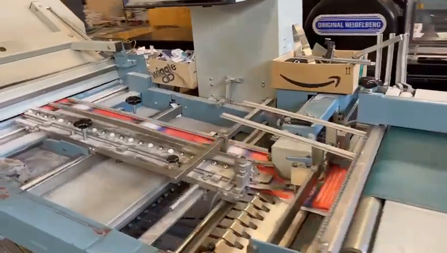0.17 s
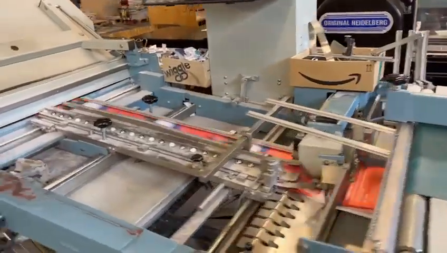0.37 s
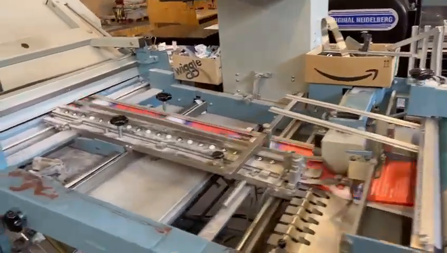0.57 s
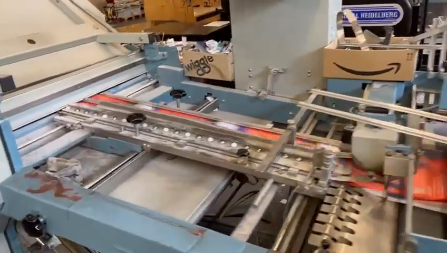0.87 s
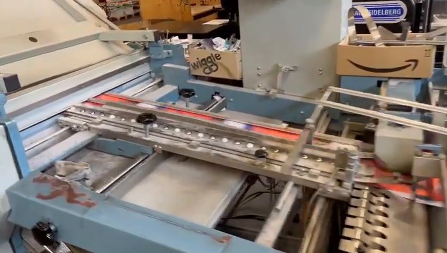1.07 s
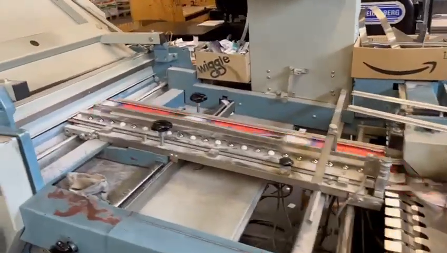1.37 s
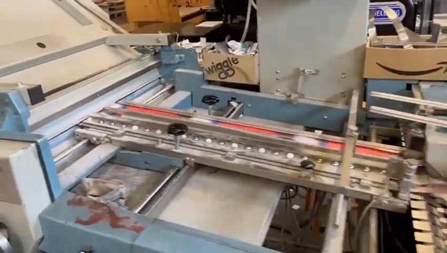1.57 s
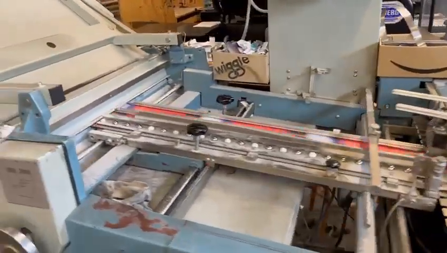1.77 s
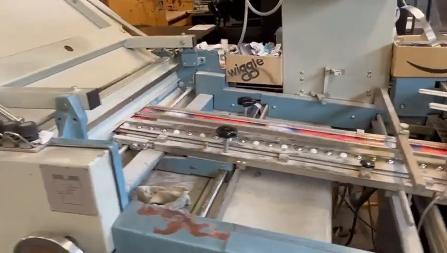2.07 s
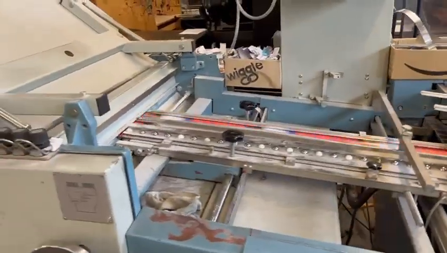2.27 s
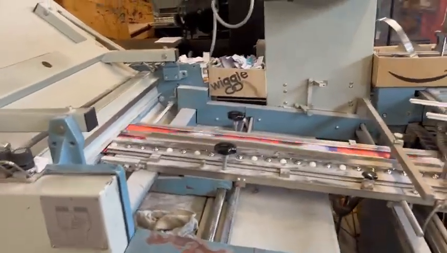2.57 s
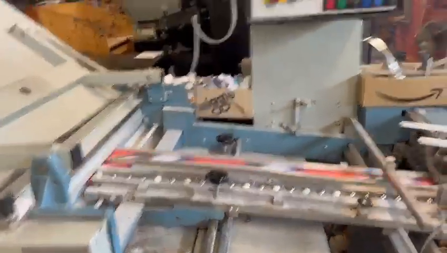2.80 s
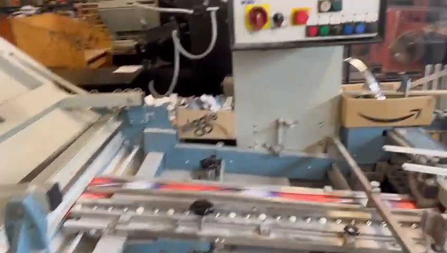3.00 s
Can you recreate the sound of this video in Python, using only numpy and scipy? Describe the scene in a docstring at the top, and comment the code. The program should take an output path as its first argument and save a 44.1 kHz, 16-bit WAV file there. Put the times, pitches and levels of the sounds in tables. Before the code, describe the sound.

A paper folding machine runs without pause in a print workshop, heard close: dense roller whir, five metal knocks a second, each followed by a papery rush, slap and light tap; clatter slowly recedes.

```python
"""Paper folder, close by the fold plates

A folding machine in a print workshop takes about five sheets a second; rollers and gears whir as dense tiny contacts.
Each cycle brings a metal knock of ringing modes, a noise rush of paper with a swelling hum, then a slap and a lighter tap.
Ticks, clunks, rattles and one low thump fall between, with short reflections from the panels and the room.
The microphone draws slowly away from the clatter, then comes back a little at the end."""
import sys
import numpy as np
from scipy import signal
from scipy.fft import rfft, irfft
from scipy.io import wavfile

SR = 44100
rng = np.random.default_rng(int(sys.argv[2]) if len(sys.argv) > 2 else 0)


def inscribe(sig):
    """Save sig as 16-bit PCM at rate SR to the path in sys.argv[1].

    A 1-D sig is mono; a 2-D sig holds one channel per row.
    Samples are clipped to [-1, 1] before scaling.
    """
    pcm = np.round(np.clip(np.atleast_2d(sig).T, -1, 1) * 32767)
    wavfile.write(sys.argv[1], SR, pcm.astype(np.int16))


N = 138474
T = np.arange(N) / SR
FFT_SIZE = 9 * 2 ** 14
HZ = np.maximum(np.arange(FFT_SIZE // 2 + 1) * SR / FFT_SIZE, 1)

CYCLE_S, FIRST_CYCLE_S = .1897, .0855
SHEET_FOLLOWS = 0.88   # share of the change with closeness that paper noise takes

# slap of each sheet leaving the fold: t/s, relative level/dB
SLAP_TIMES = [(0.0222, -7), (0.2098, -10), (0.3988, -8.5), (0.5927, -8.5), (0.7902, -9.5), (0.9699, -11),
              (1.1599, -16), (1.3482, -9), (1.5384, -7), (1.7297, -12), (1.9176, -9.5), (2.1128, -9),
              (2.2991, -8), (2.4924, -6.5), (2.6787, -12), (2.8641, -11), (3.0616, -13)]
# lighter tap late in each cycle: t/s, relative level/dB
TAP_TIMES = [(0.0505, -10.5), (0.2368, -8.5), (0.4281, -15), (0.6186, -7.5), (0.8087, -8.5), (0.9991, -7),
             (1.1889, -8.5), (1.3778, -9.5), (1.5655, -9), (1.756, -12.5), (1.9462, -11), (2.1353, -9.5),
             (2.327, -8), (2.5174, -8), (2.7057, -12), (2.8936, -13.5), (3.0896, -13)]
# knock opening each cycle: t/s, body/dB, bright ring/dB, clang f/Hz, clang/dB, ping f/Hz, ping/dB (levels relative)
KNOCK_TIMES = [(0.0907, -14, -19, 685, -12, 3720, -12.5), (0.2790, -12, -21.5, 650, -20, 4600, -20),
               (0.4660, -13, -17, 1020, -17, 2330, -16), (0.6560, -10.5, -13.5, 1890, -9, 3800, -14),
               (0.8464, -13, -16, 1870, -13.5, 3800, -17), (1.0350, -13.5, -16.5, 1730, -18, 2760, -18),
               (1.2250, -14, -13, 2830, -17, 3444, -13), (1.4145, -14, -15, 1530, -17, 3420, -11),
               (1.6040, -15.5, -16, 1520, -17, 3730, -13), (1.7940, -22, -30, 1480, -17, 2450, -22),
               (1.9840, -16.5, -18.5, 1543, -16, 3600, -19), (2.1750, -15.5, -14.5, 1510, -13, 3320, -17),
               (2.3640, -16.5, -18, 1600, -19, 3800, -18), (2.5555, -16.5, -18, 810, -19, 3800, -14),
               (2.7440, -13, -15, 1550, -11, 3820, -19), (2.9315, -18, -17, 1520, -15, 3080, -13),
               (3.1290, -15.5, -19, 1550, -18, 3600, -21)]
# snapping paper, in crackle and ticks: f/Hz, relative level/dB per Hz
PAPER_SNAP = [(300, -27), (1000, -13), (1700, 3.5), (2400, 3.5), (3400, 2), (5000, -9.5), (7000, -22.5),
              (12000, -25.5)]


def from_db(db):
    """Decibels to gain."""
    return 10 ** (np.asarray(db) / 20)


def rms_one(x):
    """Scale to unit power."""
    return x / np.sqrt(np.mean(x ** 2) + 1e-20)


def decay(age, t60):
    """Exponential decay that falls 60 dB in t60 seconds."""
    return np.exp(-np.log(1000) * age / t60)


def over_hz(points):
    """Read a table along log frequency."""
    hz, value = np.transpose(points)
    return np.interp(np.log(HZ), np.log(hz), value)


def colour(x, spectrum):
    """Minimum-phase filter with the given spectrum, its phase found by folding the cepstrum; unit power out."""
    cepstrum = irfft(np.log(from_db(over_hz(spectrum))))
    cepstrum[1:FFT_SIZE // 2] *= 2
    cepstrum[FFT_SIZE // 2 + 1:] = 0
    response = np.exp(rfft(cepstrum))
    return rms_one(irfft(rfft(x, FFT_SIZE) * response)[..., :N])


def drift(rate_hz):
    """Slow chance with unit spread, drawn at every 32nd sample."""
    lowpass = signal.butter(2, rate_hz, fs=SR / 32, output="sos")
    slow = signal.sosfilt(lowpass, rng.standard_normal(N // 32 + 1002))[1000:]   # drop the filter's start
    return np.interp(np.arange(N) / 32, np.arange(len(slow)), rms_one(slow))


def grains(per_s, spread_db, smooth, smear_s=0.0073, count=3):
    """Tiny uneven contacts scattered in time, over smooth noise; two channels share times but not signs or scatter."""
    out, age = 0, T[:SR // 50]
    for _ in range(count):
        struck = rng.random(N) < per_s / count / SR
        sizes = struck * from_db(spread_db * np.minimum(rng.exponential(1, N), 3))
        scatter = rfft(rng.standard_normal((2, len(age))) * decay(age, smear_s))
        kernel = irfft(scatter / np.abs(scatter) ** .5)   # evens out the scatter's spectrum
        signed = sizes * rng.choice([-1, 1], (2, N))
        out = out + signal.oaconvolve(signed, kernel, axes=1)[:, :N]
    return rms_one(rms_one(out) + smooth * rng.standard_normal((2, N)))


def stereo_pair(pair):
    """Two unrelated signals become a partly alike stereo pair."""
    # likeness of left and right: f/Hz, likeness (limited below to 0-0.99)
    likeness = [(60, 1.6), (130, 1.2), (270, 1), (590, .5), (1100, 0.25), (1550, 0.4), (1850, 0.55),
                (2400, 0.62), (3400, 0.38), (5000, 0.76), (6600, 0.1), (7600, 0.96), (11000, 1.75)]
    # stereo phase: f/Hz, left minus right/rad; near-opposite sides in the high treble
    phase_lead = [(60, 0), (500, -.2), (1050, -.8), (1550, -2.3), (1800, 0), (2400, .2), (3000, .7),
                  (5000, .1), (6500, -.8), (7400, -3.1), (9550, -3.2), (9900, -4.6), (10500, -5.1),
                  (11000, -6.3)]
    # stereo level: f/Hz, left minus right/dB
    tilt = [(60, -0.5), (350, 1.7), (700, -1), (1200, -2.5), (1550, -4.5), (1780, 3.5), (2300, 2),
            (3300, 4), (5000, 1), (8000, 2), (11000, 0)]
    mid, side = rfft(pair, FFT_SIZE)
    alike = np.clip(over_hz(likeness), 0, .99)
    sign = np.array([[1], [-1]])
    both = (np.sqrt(1 + alike) * mid + sign * np.sqrt(1 - alike) * side) / np.sqrt(2)
    level = from_db(sign * over_hz(tilt) / 2)
    turn = np.exp(.5j * sign * over_hz(phase_lead))
    return irfft(both * level * turn)[:, :N]


def pan(x, left_db):
    """Place a sound between the ears by level, left_db being left minus right."""
    return x * from_db([[left_db / 2], [-left_db / 2]])


def since(offset_s):
    """Time since a given point of the machine's cycle last came round."""
    return (T - FIRST_CYCLE_S - offset_s) % CYCLE_S


def passing():
    """How far a sheet is in the rollers, 0-1."""
    in_s, rise_s, out_s, fall_s = 0.011, 0.016, 0.11, 0.033
    age = since(0)
    return np.clip((age - in_s) / rise_s, 0, 1) * np.clip(1 - (age - out_s) / fall_s, 0, 1)


def bursts(rows, attack_s, jitter_s, vary_db):
    """Envelope of bursts that return every cycle, each with its own small delay and strength."""
    power = 0
    for offset_s, db, t60 in rows:
        late, strong = rng.standard_normal((int(T[-1] / CYCLE_S) + 4, 2)).T
        cycle = ((T - FIRST_CYCLE_S - offset_s) / CYCLE_S + 2).astype(int)
        age = np.maximum(since(offset_s) - jitter_s * np.abs(late)[cycle], 0)
        gain = from_db(db + vary_db * strong)[cycle]
        power = power + (np.minimum(age / attack_s, 1) * gain * decay(age, t60)) ** 2
    return np.sqrt(power)


def swells(rows, attack_s):
    """Envelope of single bursts (t/s, level/dB, t60/s), each ending after its t60."""
    out = np.zeros(N)
    for s, db, t60 in rows:
        live = slice(*np.searchsorted(T, [s, s + t60]))
        age = T[live] - s
        out[live] += from_db(db) * np.minimum(age / attack_s, 1) * decay(age, t60)
    return out


def strike(hits, modes, vary_db):
    """Clicks set decaying resonators ringing, each mode with a strength of its own for every click."""
    s, db = np.transpose(hits)
    at = np.clip((s * SR).astype(int), 0, N - 1)
    out = np.zeros(N)
    for k, (hz, mode_db, t60) in enumerate(modes):
        clicks = np.full(N, 1e-18)
        clicks[at] = from_db(db + mode_db + vary_db * rng.standard_normal(len(s)))
        r = decay(1 / SR, t60)
        w = 2 * np.pi * hz / SR
        ring = signal.lfilter([0, np.sin(w)], [1, -2 * r * np.cos(w), r * r], clicks)
        out += (-1) ** k * ring
    return out


def rings(rows, t60):
    """Single rings (t/s, level/dB, f/Hz), all dying at the same rate."""
    return sum(strike([(s, db)], [(hz, 0, t60)], vary_db=0.5) for s, db, hz in rows)


def rollers(near_db, level_db=-23.5, follows=0.35):
    """Rollers, belts and gears whir without a break: countless small contacts."""
    # whir spectrum: f/Hz, relative level/dB per Hz
    whir = [(25, -25), (50, -11.5), (70, -2), (90, -1), (125, -3), (155, -2), (190, -4), (260, 0),
            (400, -1.5), (520, -0.5), (720, -1.5), (1050, -2.5), (1550, -1.5), (2100, -5), (2700, -7),
            (4000, -9.5), (6300, -15), (8500, -25.5), (10500, -19.5), (12000, -25)]
    contacts = grains(per_s=1200, spread_db=2.0, smooth=0.73, smear_s=0.014)
    return from_db(level_db + follows * near_db) * colour(contacts, whir)


def sheets(near_db, rush_db=-25, flutter_db=1.4):
    """Each sheet rushes through the rollers as grainy noise, its edges flicking as it is folded."""
    # rush spectrum: f/Hz, relative level/dB per Hz
    rush_spectrum = [(100, -12.5), (220, 0.5), (300, 0), (450, 1.5), (750, 0.5), (1000, -3), (1600, -0.5),
                     (2200, -2), (3000, 1), (4200, -4.5), (5200, -5), (6500, -6), (8500, -11.5),
                     (10500, -9.5), (12000, -13)]
    # flick spectrum: f/Hz, relative level/dB per Hz
    flick_spectrum = [(500, -24), (2000, -9), (3500, 5.5), (6000, 10.5), (9000, -16), (12000, -21)]
    # flicking paper edges: t into the cycle/s, level before closeness/dB, t60/s
    flick_times = [(.017, -33.5, .05), (.072, -29, 0.074), (.1215, -25, 0.064), (.147, -29.5, 0.045)]
    flutter = from_db(rush_db + flutter_db * drift(51))
    paper = grains(per_s=1000, spread_db=2.5, smooth=0.61, smear_s=0.0091)
    rush = flutter * passing() * colour(paper, rush_spectrum)
    edges = grains(per_s=3400, spread_db=-0.5, smooth=0.83)
    flick_shape = bursts(flick_times, attack_s=0.001, jitter_s=.0015, vary_db=3.0)
    flicks = flick_shape * colour(edges, flick_spectrum)
    return from_db(SHEET_FOLLOWS * near_db) * (rush + flicks)


def crackle(near_db, level_db=-30):
    """The passing sheet crackles in small, separate snaps."""
    snaps = grains(per_s=260, spread_db=2.5, smooth=0, smear_s=.004)
    return from_db(level_db + SHEET_FOLLOWS * near_db) * passing() * colour(snaps, PAPER_SNAP)


def rattles(near_db, follows=0.32):
    """Loose guides rattle as noise bursts at set points of the cycle, and clatter louder a few times near the start."""
    # rattle in each cycle: t into the cycle/s, level before closeness/dB, t60/s
    rattle_times = [(.002, -26, 0.051), (.031, -23, .04), (.069, -31, 0.054), (.128, -29.5, 0.058),
                    (.172, -27, 0.023)]
    # louder clatters: t/s, level/dB, t60/s
    clatter_times = [(.116, -18, 0.056), (.166, -16, .03), (.306, -21, .06), (.323, -24, 0.052),
                     (.536, -18, .04)]
    # rattle spectrum: f/Hz, relative level/dB per Hz
    spectrum = [(60, -18), (300, 3.5), (520, -5.5), (720, 5), (900, -1), (1600, -0.5), (2600, -5),
                (3500, -6.5), (4500, -21), (7000, -12), (12000, -21)]
    shape = bursts(rattle_times, attack_s=0.0011, jitter_s=0.0011, vary_db=2.0)
    shake = from_db(follows * near_db) * shape
    clatter = swells(clatter_times, attack_s=.002)
    return np.hypot(shake, clatter) * colour(grains(per_s=2500, spread_db=2.0, smooth=0.64), spectrum)


def frame(near_db, level_db=-30, hits_per_s=130, idle=0.81, spread_db=2):
    """Guide balls and gears strike the frame at random, louder while a sheet passes."""
    # resonances of frame and fold plates: f/Hz, relative level/dB, t60/s
    frame_modes = [(345, -9, 0.076), (516, -7.5, 0.079), (644, -5, 0.028), (736, -5.5, 0.059),
                   (1017, -7, 0.031), (1280, -.5, 0.031), (1537, -3, 0.04), (1787, -4, 0.031),
                   (1974, -1.5, 0.031), (2254, -6.5, 0.018), (2547, -6, 0.049), (2990, -2.5, 0.019),
                   (3480, -4, 0.02), (4990, -6, 0.016)]
    hits = [(s, spread_db * rng.standard_normal()) for s in T[rng.random(N) < hits_per_s / SR]]
    # same hits in both channels, with mode strengths drawn apart
    ringing = rms_one(np.array([strike(hits, frame_modes, vary_db=4.0) for _ in range(2)]))
    load = idle + (1 - idle) * passing()
    return from_db(level_db + near_db) * load * ringing


def hums(near_db):
    """Drive tones and panel resonances, most swelling and sinking with every sheet, roughened by slow chance."""
    # tones: f/Hz, level before closeness/dB, crest t into the cycle/s, swell depth 0-1, roughness 0-1,
    # waver rate/Hz, share of the change with closeness
    tones = [(95.1, -44, 0.17, 0.8, 0.28, 9.2, 0), (126.3, -45.5, 0.053, 0, 0.3, 8, 0),
             (408.7, -44, 0.061, 0.6, 0.54, 9.1, -1), (506.5, -43.5, 0.026, 0.3, 0.46, 10.4, 1),
             (679, -42, 0.059, 0, 0.95, 65, 2.5), (814, -43.5, 0.015, 0.66, 0.9, 48, -2),
             (1535, -45.5, 0.067, 0.46, 0.8, 39, 4.5)]
    out = 0
    for hz, db, crest_s, depth, rough, waver_hz, follows in tones:
        swell = 1 + np.clip(depth, 0, 1) * np.cos(2 * np.pi * since(crest_s) / CYCLE_S)
        turn, rough = 2 * np.pi * hz * T, np.clip(rough, 0, 1)
        steady = np.cos(turn)
        wavering = (drift(waver_hz) * np.cos(turn) + drift(waver_hz) * np.sin(turn)) / np.sqrt(2)
        tone = (1 - rough) * steady + rough * wavering
        out = out + from_db(db + follows * near_db) * rms_one(swell * tone)
    return pan(out, left_db=1.0)


def throb(level_db=-35, crest_s=0.074, sharpness=.85, waver=.13, waver_hz=14, bend_radians=.45):
    """A gear hum, locked to the cycle, throbs and bends in pitch as each sheet loads the drive."""
    gear_teeth = 36   # hum periods per cycle
    place = 2 * np.pi * since(crest_s) / CYCLE_S
    load = (.5 + .5 * np.cos(place)) ** sharpness
    bend = bend_radians * np.cos(2 * place)
    turn = 2 * np.pi * gear_teeth * T / CYCLE_S + bend + waver * drift(waver_hz)
    hum = load * (1 + waver * drift(waver_hz)) * np.cos(turn)
    return pan(from_db(level_db) * rms_one(hum), left_db=3.0)


def ticks(ring_db=-1.5, t60=.009, grit_db=-12.5):
    """Guide balls and paper edges tick between the knocks: a short ring and a little grit."""
    # sharp ticks: t/s, relative level/dB, f/Hz
    tick_times = [(.011, -14, 1800), (.167, -15, 2800), (.349, -11, 2000), (.728, -13, 2860),
                  (.916, -16, 3000), (.927, -17, 2000), (.950, -12, 2300), (1.103, -14, 2200),
                  (1.320, -13, 1720), (1.676, -18, 2200), (1.687, -17, 1500), (1.719, -22, 2500),
                  (1.824, -24, 2000), (2.081, -29, 2600), (2.248, -17, 3420), (2.311, -13, 2000),
                  (2.448, -23, 2400), (2.628, -18, 1990), (2.754, -19, 1600), (2.995, -20, 2300)]
    ring = rings([(s, db + ring_db, hz) for s, db, hz in tick_times], t60)
    grit = swells([(s - .001, db + grit_db, .02) for s, db, _ in tick_times], attack_s=.0005)
    return ring + grit * colour(rng.standard_normal(N), PAPER_SNAP)


def workshop(x, level_db=-3.5, t60=0.16):
    """Dense reflections from the machine's panels and the room: convolution with decaying noise."""
    tail = rng.standard_normal((2, N)) * decay(T, t60)
    tail /= np.sqrt(np.sum(tail ** 2) / 2)
    reflections = signal.fftconvolve(x[None], tail, axes=1)[:, :N]
    return from_db(level_db) * stereo_pair(reflections)


def scuffs():
    """Contacts grate as noise: a bright snap and a shudder on the knocks, a papery rustle on slaps and taps."""
    # grating snap of the knock: f/Hz, relative level/dB per Hz
    snap_spectrum = [(200, -13), (700, -4), (1000, -2), (1800, -3), (2400, -5), (3100, 2.5), (3900, 1.5),
                     (4500, -8), (5500, -24), (12000, -21)]
    # guides shuddering after each knock: f/Hz, relative level/dB per Hz
    shudder_spectrum = [(150, -11), (340, -0.5), (650, 2), (1000, 1), (1300, -8), (1800, -2), (2800, 0),
                        (4000, -9), (5000, -13), (12000, -19)]
    # paper around each slap and tap: f/Hz, relative level/dB per Hz
    rustle_spectrum = [(300, -7), (750, 1), (1500, 0.5), (2300, 0.5), (3500, -5), (5500, -6), (7000, -14),
                       (12000, -32)]
    snap_db, snap_t60, snap_lead_s, snap_rise_s = 0, 0.044, 0.0034, 0.0019
    shudder_db, shudder_t60 = -6, 0.067
    rustle_db, rustle_t60, rustle_lead_s = -8, 0.038, 0.003
    grit = grains(per_s=9000, spread_db=1.2, smooth=1.2, smear_s=0.0039)
    snap_rows = [(s - snap_lead_s, ring_db + snap_db, snap_t60) for s, _, ring_db, *_ in KNOCK_TIMES]
    shudder_rows = [(s - snap_lead_s, body_db + shudder_db, shudder_t60) for s, body_db, *_ in KNOCK_TIMES]
    rustle_rows = [(s - rustle_lead_s, db + rustle_db, rustle_t60) for s, db in [*SLAP_TIMES, *TAP_TIMES]]
    snap = swells(snap_rows, snap_rise_s) * colour(grit, snap_spectrum)
    shudder = swells(shudder_rows, snap_rise_s) * colour(rng.standard_normal((2, N)), shudder_spectrum)
    rustle = swells(rustle_rows, attack_s=0.0019) * colour(grit, rustle_spectrum)
    return snap + shudder + rustle


def slaps(level_db=-10, lead_s=0.000976, bounce_s=.0035, bounce_db=-4):
    """The tail of each sheet slaps a guide, which rings, and bounces once."""
    # ringing of a slapped guide: f/Hz, relative level/dB, t60/s
    guide_modes = [(483, -5, 0.019), (708, -4.5, 0.045), (1144, -7, 0.032), (1490, -13, .02),
                   (1944, -3, 0.021), (2250, -2, 0.0085), (2900, -19, 0.0087), (3510, -6.5, 0.018),
                   (4100, -5, 0.011), (5730, -13, 0.011)]
    contacts = ((0, 0), (bounce_s, bounce_db))
    hits = [(s - lead_s + lag_s, db + level_db + loss_db) for s, db in SLAP_TIMES for lag_s, loss_db in contacts]
    return strike(hits, guide_modes, vary_db=2.0)


def taps(level_db=-7.5, lead_s=0.000785):
    """A single lighter contact rings shortly before the next knock."""
    # ringing of the tap: f/Hz, relative level/dB, t60/s
    tap_modes = [(258, -9, 0.042), (753, -7, 0.019), (1050, -7.5, 0.014), (1470, -10, 0.02),
                 (1870, -2, 0.017), (2255, -1, 0.017), (3300, -13, 0.0088), (4240, -11, .006),
                 (5620, -19, 0.0055)]
    return strike([(s - lead_s, db + level_db) for s, db in TAP_TIMES], tap_modes, vary_db=3.5)


def knocks(level_db=-3.5, ring_level_db=-2, jitter_s=0.00021):
    """A metal stop is hit once a cycle, chatters and rings; each blow favours a clang and a ping of its own."""
    # contacts within one knock: t from the main one/s, level change/dB
    contacts = [(-.0036, -5), (-.0011, -1.5), (.0004, -2), (.0052, -13)]
    # ringing of the stop: f/Hz, relative level/dB, t60/s
    stop_modes = [(343, -8, 0.052), (629, -5, 0.034), (1007, -6.5, 0.023), (1515, -8, 0.022),
                  (1823, -3, 0.018), (2200, -9, 0.014), (2620, -8, 0.019), (3000, -8, 0.018),
                  (3435, -4.5, 0.024), (3720, -5, 0.018), (4470, -5, 0.022)]
    bright_above_hz = 2500
    clang_t60, ping_t60, ring_lead_s = 0.026, 0.025, 0.001503
    hits = np.array([(s + lag_s + jitter_s * rng.standard_normal(), body_db + loss_db, ring_db + loss_db)
                     for s, body_db, ring_db, *_ in KNOCK_TIMES for lag_s, loss_db in contacts])
    low_modes = [mode for mode in stop_modes if mode[0] < bright_above_hz]
    high_modes = [mode for mode in stop_modes if mode[0] >= bright_above_hz]
    body = strike(hits[:, [0, 1]], low_modes, vary_db=1.7)
    bright = strike(hits[:, [0, 2]], high_modes, vary_db=1.8)
    clang = rings([(s - ring_lead_s, db, hz) for s, _, _, hz, db, _, _ in KNOCK_TIMES], clang_t60)
    ping = rings([(s - ring_lead_s, db, hz) for s, *_, hz, db in KNOCK_TIMES], ping_t60)
    return from_db(level_db) * (body + bright) + from_db(ring_level_db) * (clang + ping)


def clunks(level_db=-3, t60=.055):
    """Now and then a fold plate gives a hollow clunk, a single decaying ring."""
    # clunks: t/s, relative level/dB, f/Hz
    clunk_times = [(.126, -19, 600), (.150, -20, 704), (.304, -16, 406), (.312, -14, 679),
                   (.320, -14.5, 502), (1.126, -21, 620), (1.184, -14.5, 757), (1.281, -16.5, 522),
                   (1.822, -18, 830), (1.840, -20.5, 700), (2.002, -18, 470), (2.020, -22, 690),
                   (2.213, -17.5, 773), (2.788, -19, 753), (2.958, -23, 450)]
    return rings([(s, db + level_db, hz) for s, db, hz in clunk_times], t60)


def thump():
    """A soft low thump of noise as the microphone swings round."""
    # the one thump: t/s, level/dB, t60/s
    burst = (2.76, -30, 0.23)
    # thump spectrum: f/Hz, relative level/dB per Hz
    spectrum = [(20, -8), (45, 0), (75, -3), (130, -16), (400, -52)]
    return swells([burst], attack_s=.02) * colour(rng.standard_normal(N), spectrum)


def scene():
    """The whole machine as heard from beside the folding table."""
    # closeness to the folding rollers: t/s, level/dB (each source takes its own share)
    nearness = [(0, 3), (.3, 2.2), (.7, 1.6), (1.2, 1), (1.8, -1.1), (2.4, -3), (3.14, -1)]
    near_db = np.interp(T, *np.transpose(nearness))
    knock = knocks()
    light = taps() + slaps() + ticks() + clunks()
    machine = rollers(near_db) + sheets(near_db) + crackle(near_db) + rattles(near_db) + frame(near_db)
    spread_out = stereo_pair(machine + scuffs())
    tones = throb() + hums(near_db)
    direct = pan(knock, left_db=2) + pan(light, left_db=0.5)
    return spread_out + tones + thump() + direct + workshop(knock + light)


def record(dry):
    """The deepest rumble is lost, the highest peaks are rounded and the top is cut steeply."""
    rumble_hz, cutoff_hz, ceiling = 42, 11800, .9
    thin = signal.sosfilt(signal.butter(2, rumble_hz, "high", fs=SR, output="sos"), dry)
    rounded = ceiling * thin / (1 + (thin / ceiling) ** 6) ** (1 / 6)
    steep = signal.ellip(10, .05, 60, cutoff_hz, fs=SR, output="sos")
    return signal.sosfiltfilt(steep, rounded)


dry = scene()
out = record(dry)
inscribe(out)
```